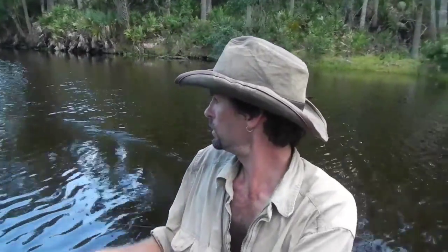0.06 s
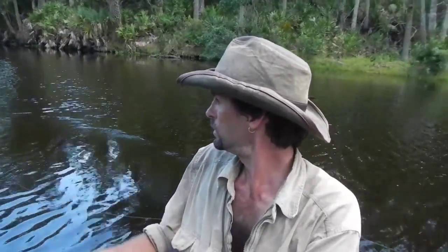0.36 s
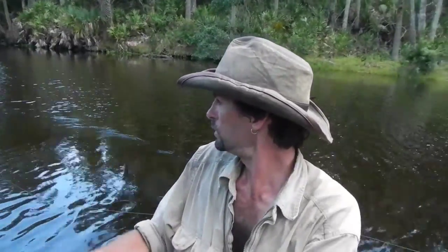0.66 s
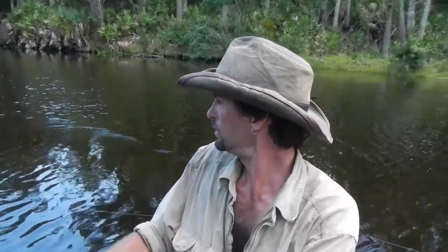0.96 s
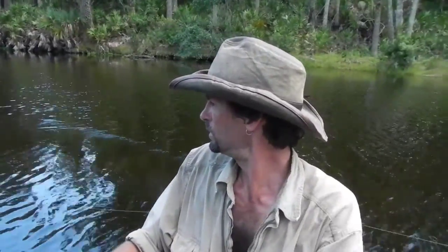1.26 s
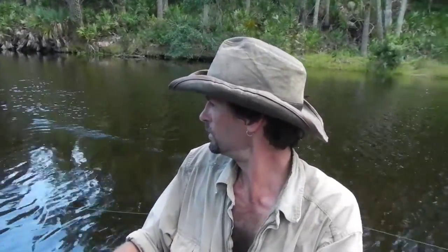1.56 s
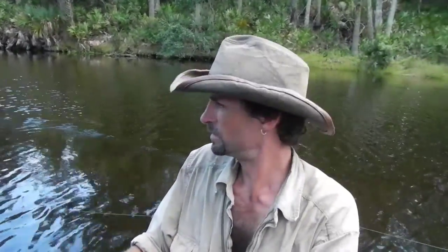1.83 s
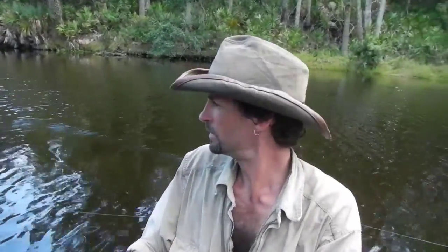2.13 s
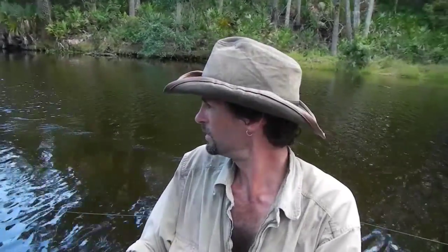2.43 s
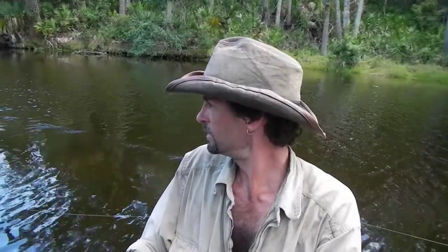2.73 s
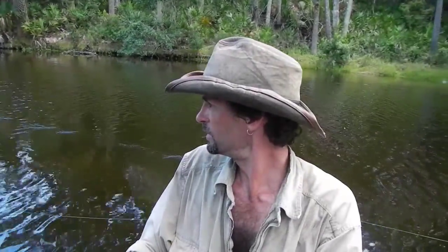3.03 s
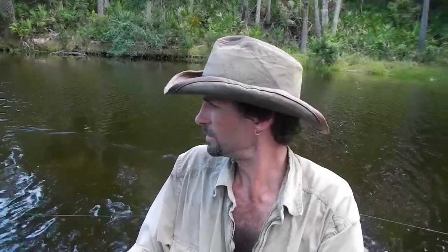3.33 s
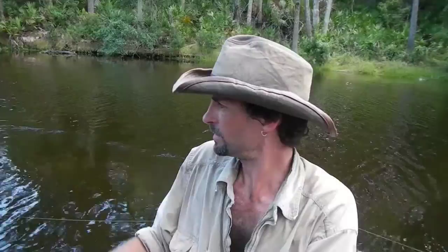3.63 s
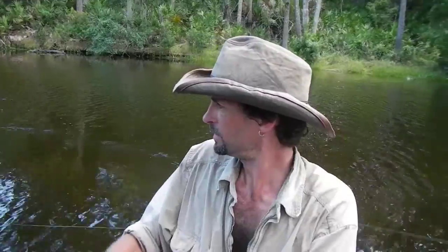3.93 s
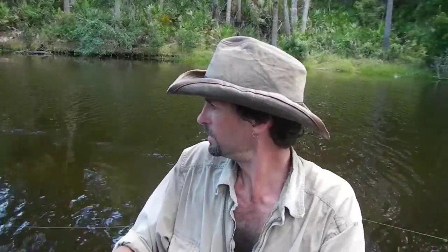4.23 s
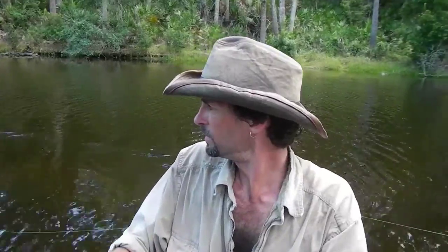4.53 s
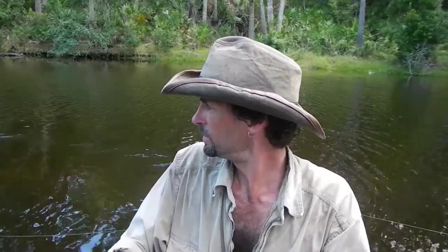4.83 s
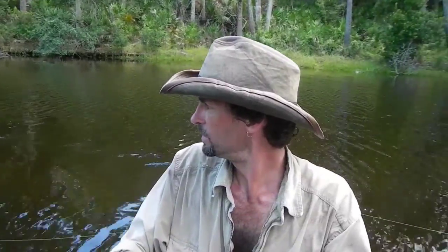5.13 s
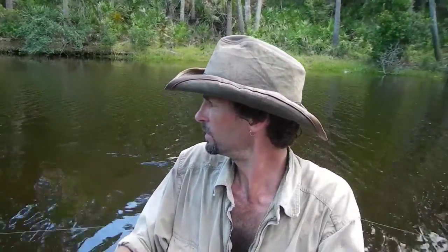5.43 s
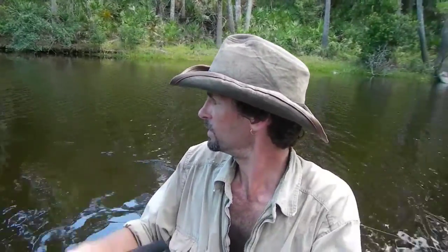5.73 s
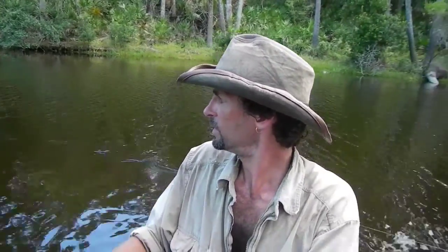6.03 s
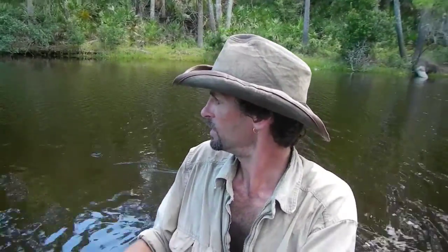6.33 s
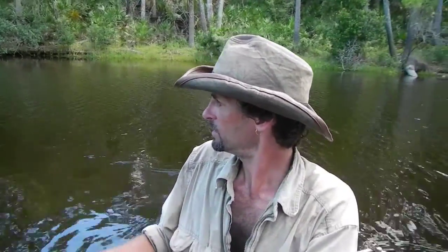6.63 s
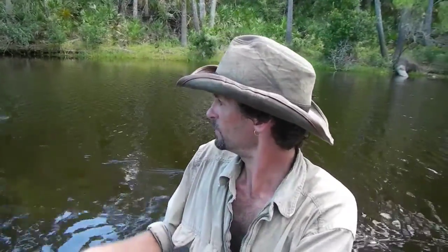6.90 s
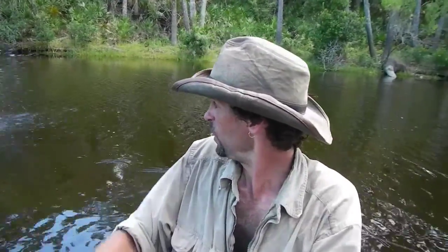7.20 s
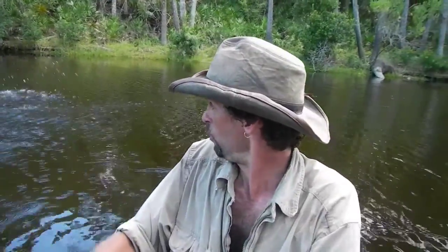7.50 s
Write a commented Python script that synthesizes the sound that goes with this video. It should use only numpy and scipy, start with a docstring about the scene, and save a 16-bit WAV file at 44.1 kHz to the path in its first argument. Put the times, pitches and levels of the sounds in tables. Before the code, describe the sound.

A fishing reel's drag clicks in short, bright bursts and single ticks near the microphone, over a soft rush of open air on a river. Faint cranking, a small gear rattle and thin squeaks of line come in between. Then a fish splashes and bubbles at the surface next to the kayak, pulling out more line in a quick ratcheting buzz.

```python
"""A fishing reel ticks and buzzes in short pulls as a fish tugs line from a kayak on a quiet river.
Each tick is the pawl, a small catch in the reel's drag, dropping off a tooth and ringing the spool.
The gears whirr as the handle is cranked, and the tight line sings and squeaks in the rod's guides.
Near the end the fish thrashes at the surface and pulls out more line: trapped air plops and bubbles,
water slaps and spray falls. A soft outdoor rush, a hiss and a thin whine lie under it all."""
import sys
import numpy as np
from scipy import signal
from scipy.fft import rfft, irfft, next_fast_len
from scipy.io import wavfile
from scipy.ndimage import uniform_filter1d, map_coordinates

SR = 44100
rng = np.random.default_rng(int(sys.argv[2]) if len(sys.argv) > 2 else 0)


def master(y):
    """Save y as 16-bit WAV."""
    cut = np.clip(np.atleast_2d(y).T, -1, 1)
    pcm = np.round(cut * 32767)  # scale
    wavfile.write(sys.argv[1], SR, pcm.astype(np.int16))


N = 333396

# Levels in the tables are relative: they compare the rows of one source.
# The drag slips by a single tooth: t/s, level/dB
SINGLE_TICKS = [(1.097, -27), (1.623, -26.5), (1.821, -22.5), (2.218, -26), (2.601, -24.5), (3.149, -26),
                (3.53, -23), (4.315, -22), (5.143, -27), (5.338, -32.5), (5.553, -23.5), (5.697, -28),
                (6.314, -18.5)]
# Tugs of the fish: t/s, length/s, teeth, lean (> 0: ends slower), ease (> 0: faster midway), level/dB
FISH_TUGS = [(.419, .117, 6, -.07, 1.16, -28), (.634, .189, 10, -.34, 1.55, -24),
             (.853, .073, 6, -.2, .66, -26.5), (.949, .084, 7, -.07, .63, -24.5),
             (1.144, .137, 8, 0, .76, -23.5), (1.312, .149, 6, .29, .47, -23.2),
             (1.927, .058, 4, .09, .12, -23.2), (3.183, .186, 21, .12, 1.15, -22.6),
             (3.432, .060, 7, -.15, .58, -23.3), (3.799, .060, 7, 0, .29, -23.5),
             (3.868, .080, 9, .42, 0, -25), (3.960, .160, 8, .83, 0, -24.3), (7.040, .170, 26, .08, 0, -24),
             (7.217, .210, 33, -.05, .3, -25), (7.435, .123, 25, -.33, 0, -23.3)]
SPEED_DB, TOOTH_SCATTER_DB = 1.1, 0.85  # gain per doubling of speed; chance change per tooth
# The ways the pawl and spool ring: f/Hz, width/Hz, level/dB
SPOOL_RESONANCES = [(1410, 510, -3.5), (1835, 250, 1), (3340, 1500, -4.5), (4560, 115, 10),
                    (5780, 1200, 0.5), (7600, 620, 4), (9330, 470, 4.5), (11280, 980, -4.5),
                    (12640, 1200, 1.5), (14700, 2800, -15)]
# Where the reel is heard: f/Hz, left minus right level/dB, lead of the left side/rad
REEL_DIRECTION = [(1500, 1.5, 0.73), (7450, 1, 0.62), (9040, 2, 2.5), (10900, 10, 0.25),
                  (12000, -1.5, -1.5)]

# The gear housing's low and high ring: f/Hz, width/Hz
HOUSING_RESONANCES = [(1470, 60), (1770, 270)]
# Spells of cranking: t/s, length/s, level/dB
CRANK_SPELLS = [(0.65, 0.4, -56.5), (1.52, 0.1, -48.5), (3.164, 0.42, -44.5), (3.635, 0.25, -46.5),
                (5.348, 0.1, -43.5), (5.72, 1.3, -47)]
SPIN_UP_S, RUN_DOWN_S = 0.063, 0.5  # time to come up to speed; time to fade by 60 dB
# Slack in the gears makes them rattle: t/s, number of knocks, level/dB
GEAR_RATTLES = [(5.17, 1, -36), (5.223, 3, -35), (5.364, 2, -37.5), (5.41, 4, -31), (5.604, 1, -36)]
KNOCK_GAP_S = .016

# The line slips in a guide: t/s, length/s, middle f/Hz, glide/octaves, level/dB
LINE_SLIPS = [(0.021, 0.014, 5120, 0, -43.5), (3.502, .013, 6780, 0, -24.5),
              (3.625, 0.068, 6634, 0.00035, -18.5), (5.811, 0.0079, 5510, 0.16, -32),
              (5.839, 0.013, 6380, .05, -35.5), (5.964, 0.018, 5990, 0.091, -24.5),
              (5.979, .01, 6210, .08, -18.5), (6.003, 0.016, 6360, 0.01, -23),
              (6.297, 0.019, 5670, 0.18, -24), (6.356, .014, 5480, 0.14, -25.5),
              (6.599, 0.025, 5310, .11, -32), (6.865, 0.018, 5250, 0.14, -26.5),
              (6.887, .016, 5700, .05, -23), (7.490, .012, 5770, -0.17, -23)]
ARCH_OCT_PER_S = 2.25  # the longer a slip, the further its pitch sags at both ends
# The tight line slides: t/s, f/Hz, level/dB
LINE_SONG = [(1.40, 5680, -53), (1.60, 5800, -51.5), (1.68, 5230, -68), (1.80, 5400, -53),
             (1.94, 5930, -48), (2.06, 5760, -57), (2.12, 6680, -46.5), (2.25, 6850, -51),
             (2.42, 6130, -53)]

# The tail sweeps the surface: t/s, length/s, churn level/dB, spray level/dB
TAIL_SWEEPS = [(6.622, 0.017, -30.5, -36.5), (6.69, 0.24, -31, -34), (7.019, 0.091, -36, -37),
               (7.271, 0.013, -39, -36)]
SWEEP_RISE_S, CHURN_T60_S, SPRAY_T60_S = 0.012, 0.45, 0.4  # T60: time to fade by 60 dB
SPRAY_LAG = 0.11  # share of a sweep's length that its spray spends in the air
WASH_DB, DRIZZLE_DB, SETTLE_T60_S = -13, -8, 5.6  # churn and spray that linger after a sweep
THUD_DB, THUD_HZ, THUD_T60_S = -14, 157, .35  # the thud's level is set against its sweep's churn
# Tone colour of churned water: f/Hz, level/dB
CHURN_SPECTRUM = [(30, -0.5), (260, -5), (390, -8), (1000, 0), (1900, 3), (2400, -5), (3600, -7.5),
                  (9000, -57)]
# Tone colour of falling spray: f/Hz, level/dB
SPRAY_SPECTRUM = [(800, -9), (3000, -2.5), (7300, 0), (8400, -1), (10000, 3.5), (15500, -10)]
# How alike the water sounds left and right: f/Hz, likeness (0 unrelated, 1 the same)
WATER_LIKENESS = [(100, 0.67), (950, 0.87), (3800, 0.67), (15000, 0)]
# Large pockets of trapped air: t/s, starting f/Hz, level/dB, life/cycles, glide/octaves
AIR_POCKETS = [(6.597, 1540, -23.5, 21, 0.55), (6.631, 1000, -17.5, 26, -0.48),
               (6.652, 680, -25, 41, -0.51), (6.696, 1260, -16, 10, 0.067), (6.708, 935, -16, 15, -0.074),
               (6.868, 675, -16, 14, 0.66), (6.907, 448, -11, 8.1, 0.43), (7.073, 589, -23, 9.1, -0.018),
               (7.135, 842, -28.5, 35, 0.58), (7.247, 1480, -28, 35, -0.061),
               (7.283, 298, -28.5, 7.3, -0.16), (7.292, 860, -22, 14, -0.1)]
# Slaps of water, faint on the hull and hard from the tail: t/s, level/dB
WATER_SLAPS = [(5.216, -33.5), (5.291, -34), (5.478, -38), (5.58, -38), (5.897, -31.5), (6.642, -14.5),
               (6.97, -21.5), (7.047, -12.5), (7.074, -20), (7.086, -13), (7.137, -14)]
SLOSH_START_S, SLOSH_LENGTH_S, SLOSH_DB = 3.17, .5, -51.5

# Tone colour of the outdoor rush: f/Hz, level/dB
AIR_SPECTRUM = [(20, -18), (100, 0.5), (270, -10), (400, 3), (560, -4), (920, -9), (1170, 0), (1370, -7.5),
                (1490, -1), (1620, -5), (2000, -5.5), (2400, -11.5), (8000, -27)]
# Tone colour of the steady hiss: f/Hz, level/dB
HISS_SPECTRUM = [(1500, -32), (3000, -9.5), (4900, -0.5), (5900, -7), (8400, -8), (9500, -1.5),
                 (15500, -17.5)]
# How alike rush and hiss sound left and right: f/Hz, likeness
AIR_LIKENESS = [(100, 0.39), (550, 0), (1600, 0.6), (5000, 0)]
WHINE_HZ, TOP_HZ = 14835, 15900


def reel_drag():
    """The pawl scrapes up each tooth, drops off it with a short chatter and rings the spool."""
    blows, t = np.zeros((2, N)), np.arange(-SR // 30, SR // 30) / SR  # the pawl drops at t = 0
    for s, db in tooth_strikes():
        chatter = rng.standard_normal(len(t)) * (t >= 0) * fade(t, 0.013)
        chatter += np.clip(rng.normal(0, 0.073), -1, 1) * np.roll(chatter, 1)  # duller or brighter
        scrape = 0.02 * rng.standard_normal(len(t)) * fade(t, 0.095)
        echo = 0.022 * (t >= 0) * fade(t, 0.048) * rng.standard_normal((2, len(t)))  # off hull and angler
        add(blows, s + t[0], amp(db + 16) * (chatter / np.linalg.norm(chatter) + scrape + echo))
    spool = lambda f: sum((-1) ** k * amp(db) * resonance(f, hz, width)
                          for k, (hz, width, db) in enumerate(SPOOL_RESONANCES))
    sides, direction = np.array([[.5], [-.5]]), np.array(REEL_DIRECTION)
    balance = lambda f: amp(sides * value_at(direction[:, :2], f))
    lead = lambda f: np.exp(1j * sides * value_at(direction[:, ::2], f))
    return filtered(blows, lambda f: spool(f) * balance(f) * lead(f))


def tooth_strikes():
    """List t/s, level/dB for every tooth: the spool's speed changes in a tug, and fast teeth hit harder."""
    strikes = list(SINGLE_TICKS)
    for start, length, count, lean, ease, db in FISH_TUGS:
        place = np.linspace(-1, 1, 2 * count - 1)  # teeth and the gaps between them, in turn
        slowness = np.exp(lean * place + ease * place ** 2)
        elapsed = np.append(0, np.cumsum(slowness[1::2]))
        speed = -np.log2(slowness[::2])
        levels = db + SPEED_DB * (speed - speed.mean()) + rng.normal(0, TOOTH_SCATTER_DB, count)
        strikes += zip(start + length * elapsed / elapsed[-1], levels)
    return strikes


def crank_gears():
    """Gear teeth rub unevenly and ring the housing's high note; loose knocks ring its low one."""
    (low_hz, low_width), (high_hz, high_width) = HOUSING_RESONANCES
    effort = sum(amp(db) * swell(s, length, SPIN_UP_S, RUN_DOWN_S) for s, length, db in CRANK_SPELLS)
    rub = rng.standard_normal(N) * amp(3.6 * wobble(130))
    housing = lambda f: resonance(f, high_hz, high_width) ** 2 + 0.28 * resonance(f, high_hz, 2000)
    whirr = unit_rms(filtered(rub, housing))
    knocks, t = np.zeros(N), np.arange(SR // 30) / SR
    ring_shape = np.exp(-np.pi * low_width * t) * (1 - np.exp(-t / 0.0017))
    for s, count, db in GEAR_RATTLES:
        for k in range(count):
            ring = np.sin(2 * np.pi * low_hz * rng.normal(1, 0.041) * t) * ring_shape
            click = 0.11 * rng.standard_normal(len(t)) * fade(t, 0.016)
            add(knocks, s + k * KNOCK_GAP_S, amp(db + 4) * (ring + click))
    return effort * whirr + knocks


def line_squeaks():
    """The wet line sticks and slips: a wavering tone with a weak octave above it and a little rasp."""
    squeaks = np.zeros(N)
    waver, flutter = wobble(500), wobble(260)
    for s, length, middle_hz, glide, db in LINE_SLIPS:
        place = np.linspace(-.5, .5, int(length * SR))
        now = slice(int(s * SR), int(s * SR) + len(place))
        arch = ARCH_OCT_PER_S * length * np.sin(np.pi * place) ** 2
        hz = middle_hz * 2 ** (glide * place - arch) * (1 + 0.01 * waver[now])
        phase = 2 * np.pi * np.cumsum(hz) / SR
        tone = np.sin(phase) + amp(-18) * np.sin(2 * phase) + amp(-27) * rng.standard_normal(len(place))
        soft_ends = signal.windows.tukey(len(place), min(.3 + .009 / length, 1))
        add(squeaks, s, np.sqrt(2) * amp(db + 1.3 * flutter[now]) * soft_ends * tone)
    t = np.arange(SR // 10) / SR
    hull_bounce = unit_rms(rng.standard_normal((2, len(t))) * fade(t, 0.18)) / np.sqrt(len(t))
    echo = amp(-20) * signal.fftconvolve(squeaks[None], hull_bounce, axes=1)[:, :N]
    return squeaks * amp([[.8], [-.8]]) + echo  # a little to the left


def line_song():
    """The tight line sings as it slides: a narrow hiss whose pitch follows its running speed."""
    times, pitches, levels = np.transpose(LINE_SONG)
    t = np.arange(N) / SR
    hz, db = np.interp(t, times, pitches), np.interp(t, times, levels)
    running = uniform_filter1d(1. * (t > times[0]) * (t < times[-1]), size=SR // 20)
    blur = unit_rms(filtered(rng.standard_normal((2, N)), lambda f: 1 / (1 + (f / 225) ** 3)))
    phase = 2 * np.pi * np.cumsum(hz) / SR
    return running * amp(db) * (blur[0] * np.cos(phase) + blur[1] * np.sin(phase))


def splash():
    """Water churned by the tail rings with bubbles; thrown drops crackle as they land."""
    strokes = [(s, length, db) for s, length, db, _ in TAIL_SWEEPS]
    landings = [(s + SPRAY_LAG * length, length, db) for s, length, _, db in TAIL_SWEEPS]
    start, end = TAIL_SWEEPS[0][0], N / SR
    froth = lambda: rng.standard_normal((2, N)) * amp(3.1 * wobble(150))
    swarm = bubble_swarm(start, end, low_hz=348, high_hz=3540, cycles=18.2, range_db=11.5, count=600)
    drops = bubble_swarm(start, end, low_hz=2300, high_hz=14900, cycles=13, range_db=6, count=2500)
    churn = stereo(swarm + 1.5 * froth(), CHURN_SPECTRUM, WATER_LIKENESS)
    spray = stereo(drops + 0.91 * froth(), SPRAY_SPECTRUM, WATER_LIKENESS)
    churn *= stirring(strokes, CHURN_T60_S, WASH_DB) / np.std(churn[:, int(start * SR):])
    spray *= stirring(landings, SPRAY_T60_S, DRIZZLE_DB) / np.std(spray[:, int(start * SR):])
    return (churn + spray) * amp([[.8], [-.8]])


def stirring(sweeps, t60, linger_db):
    """Loudness of stirred water: each sweep dies quickly and leaves a quiet part that settles slowly."""
    bursts = [amp(db) * swell(s, length, SWEEP_RISE_S, t60) for s, length, db in sweeps]
    remains = [amp(db + linger_db) * swell(s, length, SWEEP_RISE_S, SETTLE_T60_S)
               for s, length, db in sweeps]
    return np.linalg.norm(bursts + remains, axis=0)


def plops_and_slaps():
    """The tail traps large air pockets that ring; water slaps with a short crack."""
    plops, cracks, t = np.zeros(N), np.zeros((2, N)), np.arange(SR // 30) / SR
    for s, hz, db, cycles, glide in AIR_POCKETS:
        add(plops, s, amp(db) * bubble(hz, cycles, glide))
    for s, db in WATER_SLAPS:
        noise = rng.standard_normal(len(t)) + 0.9 * rng.standard_normal((2, len(t)))
        add(cracks, s, amp(db + 5) * np.tanh(noise) * fade(t, 0.016))
    return plops + filtered(cracks, lambda f: resonance(f, hz=3700, width=4100))


def bubble(hz, cycles, glide):
    """An air pocket rings and dies away while its pitch moves by `glide` octaves."""
    age = np.arange(int(SR * cycles / hz) + 2) * hz / SR / cycles  # runs from 0 to 1
    phase = 2 * np.pi * np.cumsum(hz * 2 ** (glide * age)) / SR
    return np.sin(phase) * amp(-40 * age) * (1 - np.exp(-age / 0.083)) * 1.42


def bubble_swarm(start, end, low_hz, high_hz, cycles, range_db, count):
    """Small bubbles ring at random times and pitches, in two unrelated tracks."""
    pair = np.zeros((2, N))
    for track in pair:
        for when, pitch, size, life in rng.random((count, 4)):
            ring = bubble(low_hz * (high_hz / low_hz) ** pitch, cycles * (.5 + life), glide=0.29)
            add(track, start + when * (end - start), amp(range_db * size ** 2) * ring)
        track /= np.std(track[int(start * SR):int(end * SR)])
    return pair


def tail_thuds():
    """Each sweep first shoves the water aside with a dull thud."""
    shove = sum(amp(db + THUD_DB) * swell(s, SWEEP_RISE_S, SWEEP_RISE_S, THUD_T60_S)
                for s, _, db, _ in TAIL_SWEEPS)
    rumble = filtered(rng.standard_normal(N), lambda f: resonance(f, THUD_HZ, 2 * THUD_HZ) ** 2)
    return shove * unit_rms(rumble)


def hull_slosh():
    """Water gurgles softly along the hull as the boat is pulled round."""
    start, length = SLOSH_START_S, SLOSH_LENGTH_S
    gurgle = bubble_swarm(start, start + 2 * length, 694, 1780, cycles=14, range_db=6, count=120)
    water = stereo(gurgle + 2.1 * rng.standard_normal((2, N)), CHURN_SPECTRUM, WATER_LIKENESS)
    water /= np.std(water[:, int(start * SR):int((start + length) * SR)])
    return amp(SLOSH_DB) * swell(start, length, rise=0.17, t60=1.0) * water


def background():
    """A soft, wavering outdoor rush, a steady hiss and a thin electronic whine."""
    air_gain = amp(-49 + 0.66 * wobble(4.46))
    air = air_gain * stereo(rng.standard_normal((2, N)), AIR_SPECTRUM, AIR_LIKENESS)
    hiss = amp(-54) * stereo(rng.standard_normal((2, N)), HISS_SPECTRUM, AIR_LIKENESS)
    whine = amp(-57.5) * np.sin(2 * np.pi * WHINE_HZ * np.arange(N) / SR)
    return air + hiss + whine


def amp(db):
    """Turn decibels into a gain to multiply by."""
    return 10 ** (np.asarray(db) / 20)


def unit_rms(x):
    """Scale a signal so that its average strength (rms) is 1."""
    return x / np.sqrt(np.mean(x ** 2) + 1e-20)


def fade(t, t60):
    """A gain that falls by 60 dB for every t60 seconds away from t = 0."""
    return amp(-60 * np.abs(t) / t60)


def swell(start, length, rise, t60):
    """A gain that rises from start, holds until length has passed and then dies away."""
    t = np.arange(N) / SR - start
    return np.clip(t / rise, 0, 1) * fade(np.maximum(t - length, 0), t60)


def wobble(rate):
    """A smooth curve through `rate` random values a second."""
    return map_coordinates(rng.standard_normal(int(N * rate / SR) + 4), [np.arange(N) * rate / SR])


def value_at(points, hz):
    """Read between the rows of an f/Hz, value table, on a log frequency scale."""
    f, values = np.transpose(points)
    return np.interp(np.log(hz + 1), np.log(f + 1), values)


def add(track, s, sound):
    """Mix a sound into a track at s seconds."""
    room = track[..., max(round(s * SR), 0):][..., :sound.shape[-1]]
    room += sound[..., :room.shape[-1]]


def filtered(x, response):
    """Multiply each frequency f in x by response(f)."""
    size = next_fast_len(N + SR // 2)
    return irfft(rfft(x, size) * response(np.fft.rfftfreq(size, 1 / SR)), size)[..., :N]


def resonance(f, hz, width):
    """The response of something that rings at hz; a smaller width rings longer."""
    return 1j * f * width / (hz * hz - f * f + 1j * f * width)


def stereo(pair, spectrum, likeness):
    """Blend two unrelated signals into left and right with a given tone colour, at rms 1."""
    angle = lambda f: np.arccos(np.clip(value_at(likeness, f), -1, 1)) / 2
    shares = lambda f: [np.cos(angle(f)), np.sin(angle(f))]
    mid, side = filtered(pair, lambda f: amp(value_at(spectrum, f)) * shares(f))
    return unit_rms(np.array([mid + side, mid - side]))


def scene():
    """Reel and line close by, the fish beside the boat."""
    tackle = reel_drag() + crank_gears() + line_squeaks() + line_song()
    water = hull_slosh() + splash() + tail_thuds() + plops_and_slaps()
    return tackle + water + background()


def record(dry):
    """Cut away the treble above TOP_HZ."""
    return filtered(dry, lambda f: f < TOP_HZ)


dry = scene()
out = record(dry)
master(out)
```